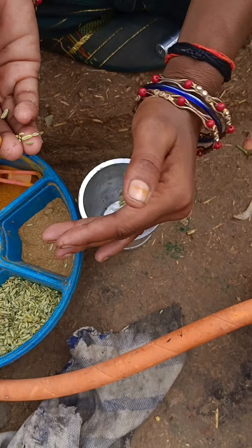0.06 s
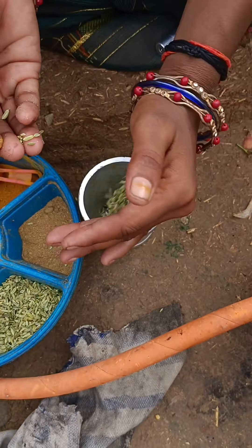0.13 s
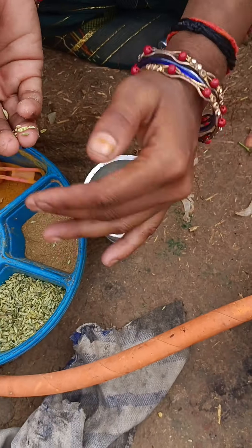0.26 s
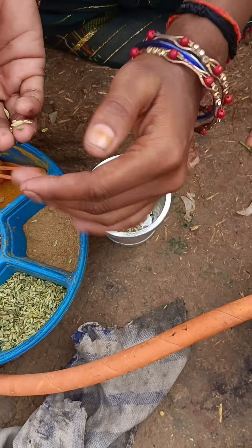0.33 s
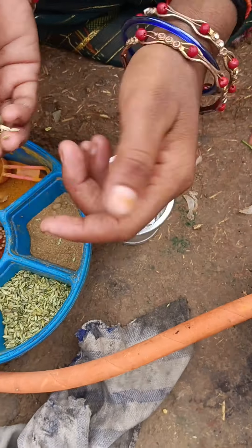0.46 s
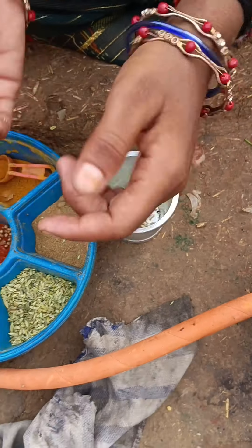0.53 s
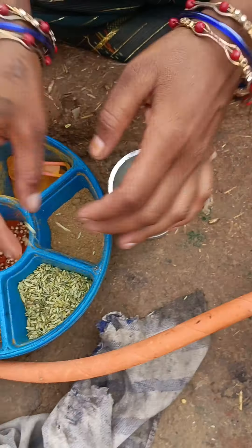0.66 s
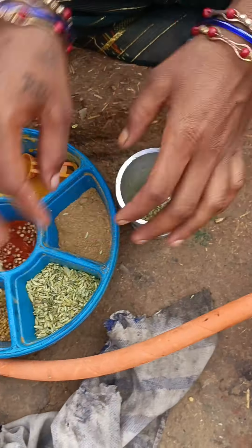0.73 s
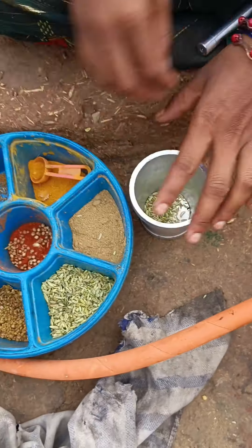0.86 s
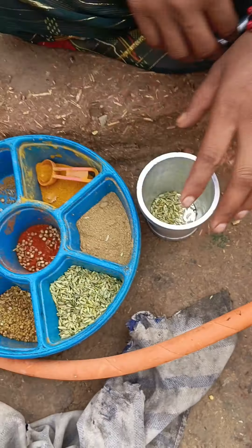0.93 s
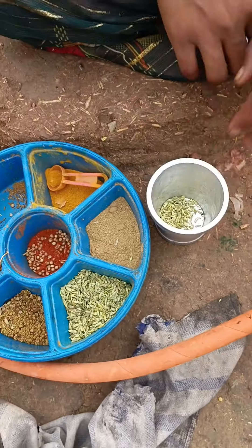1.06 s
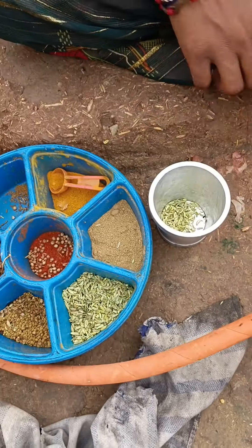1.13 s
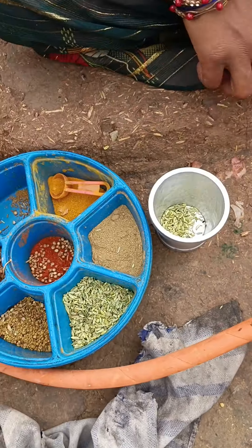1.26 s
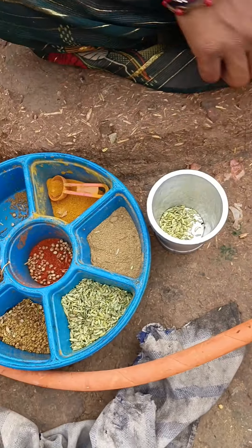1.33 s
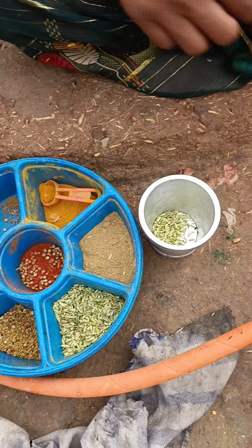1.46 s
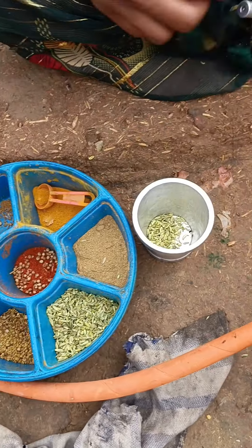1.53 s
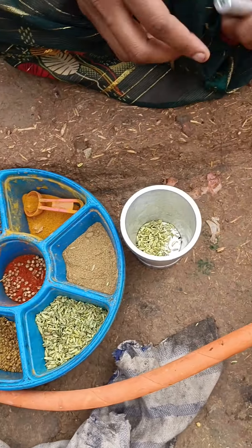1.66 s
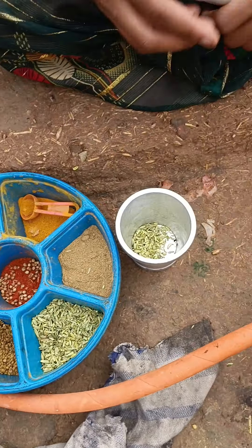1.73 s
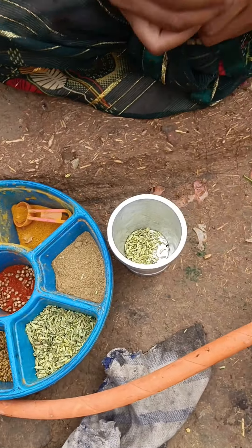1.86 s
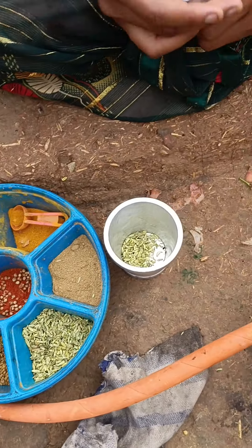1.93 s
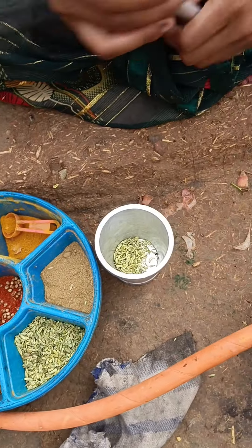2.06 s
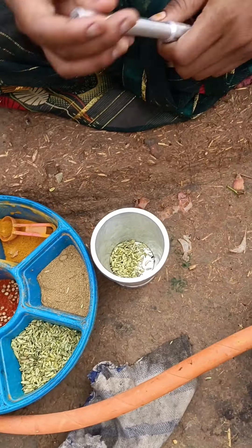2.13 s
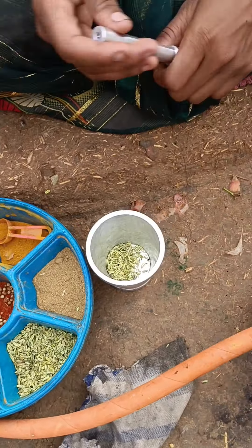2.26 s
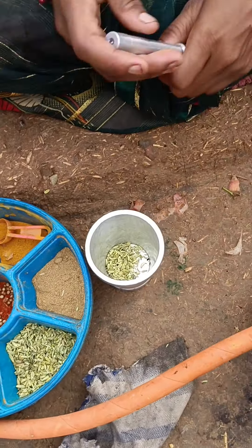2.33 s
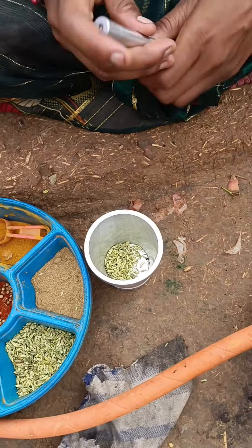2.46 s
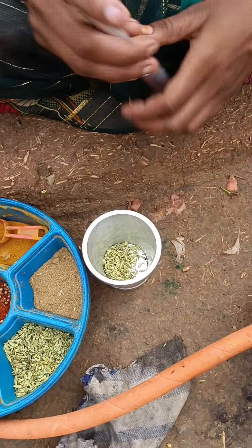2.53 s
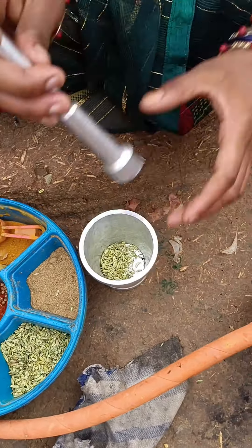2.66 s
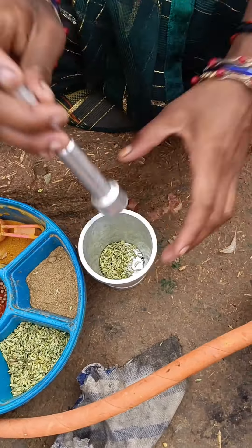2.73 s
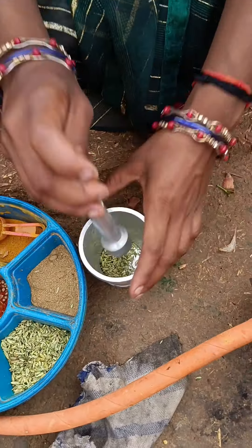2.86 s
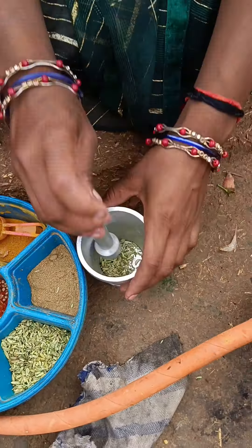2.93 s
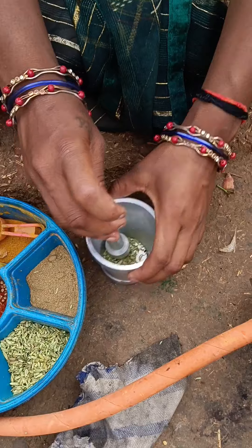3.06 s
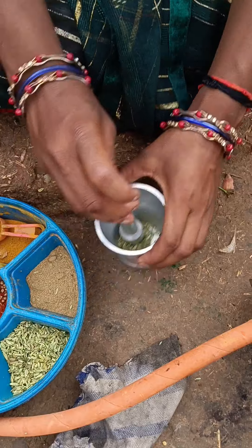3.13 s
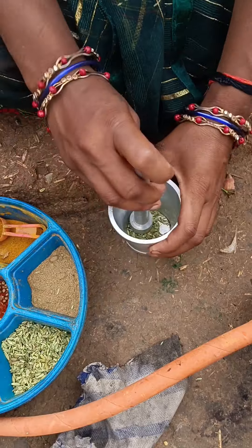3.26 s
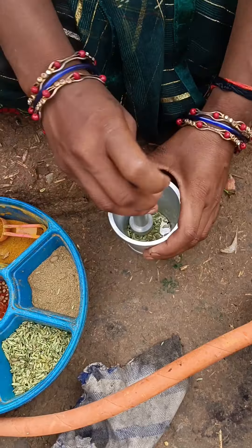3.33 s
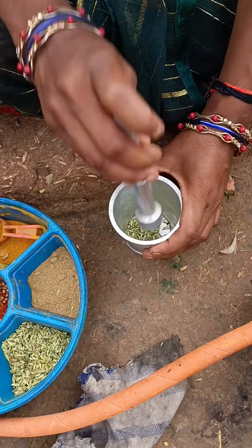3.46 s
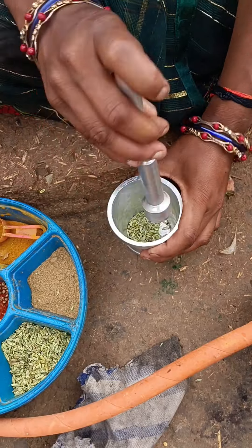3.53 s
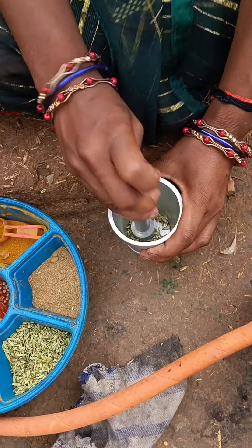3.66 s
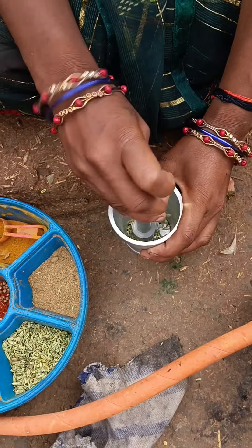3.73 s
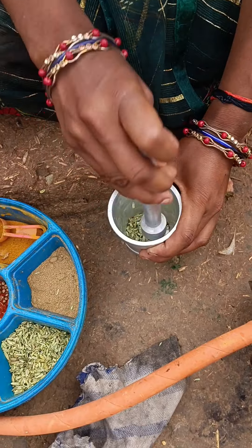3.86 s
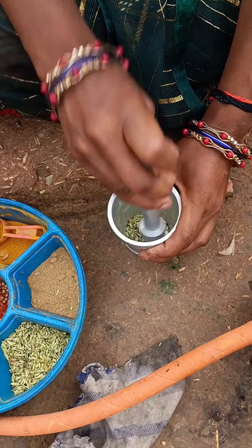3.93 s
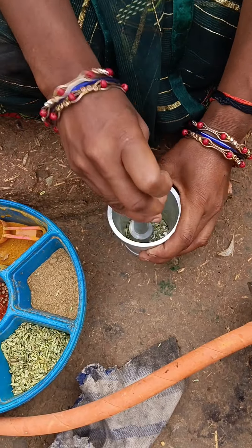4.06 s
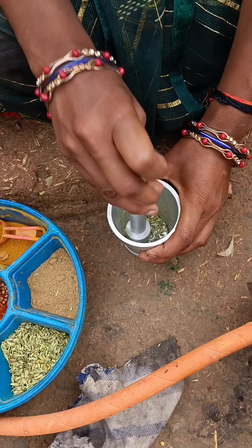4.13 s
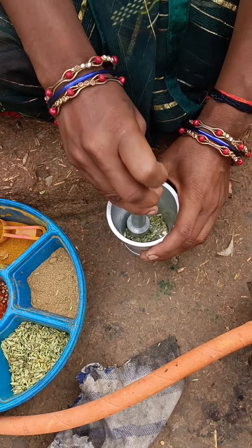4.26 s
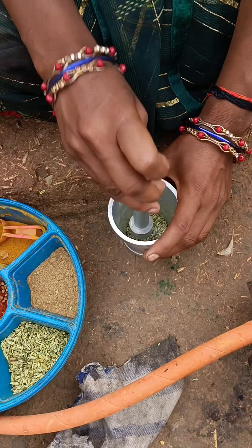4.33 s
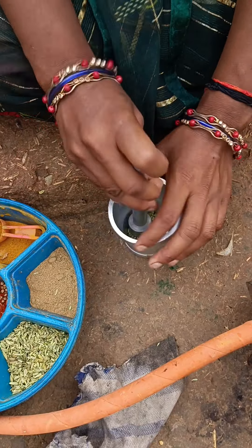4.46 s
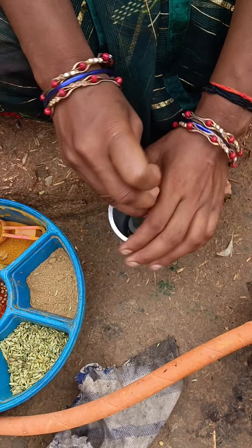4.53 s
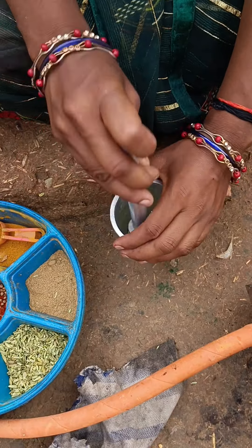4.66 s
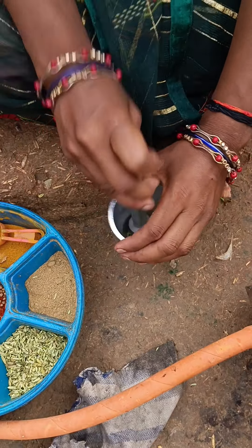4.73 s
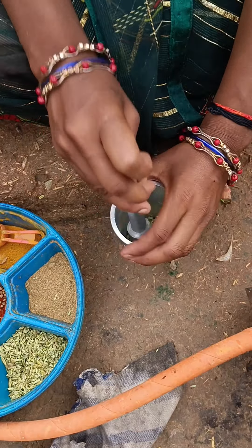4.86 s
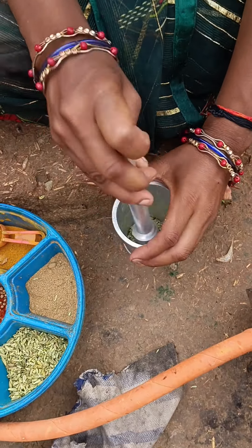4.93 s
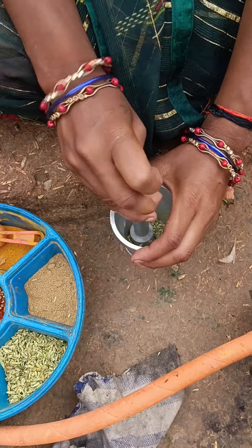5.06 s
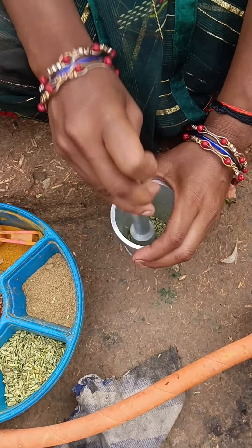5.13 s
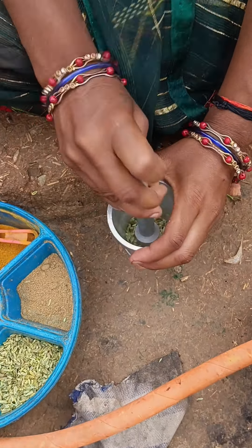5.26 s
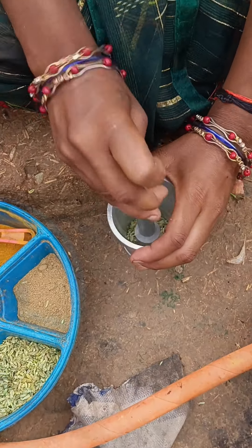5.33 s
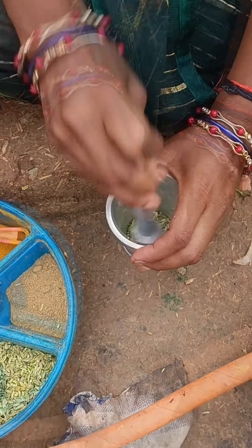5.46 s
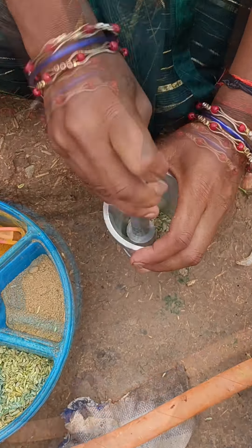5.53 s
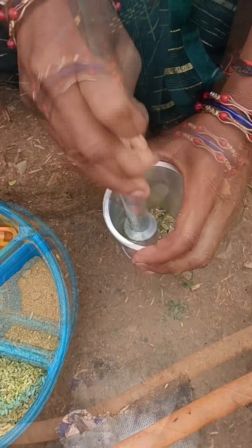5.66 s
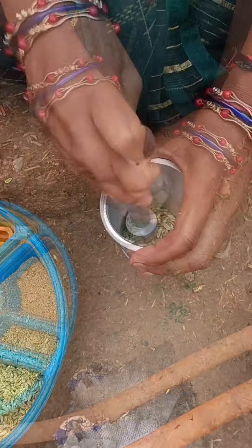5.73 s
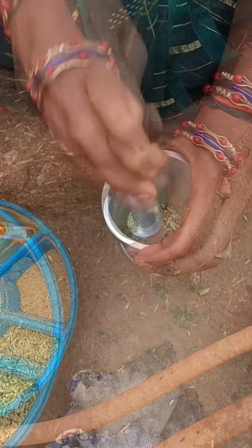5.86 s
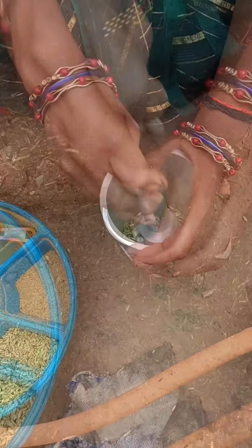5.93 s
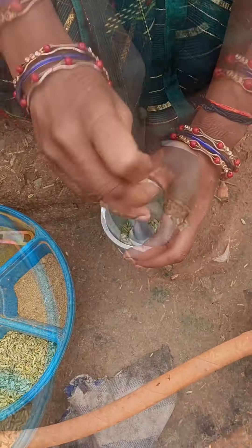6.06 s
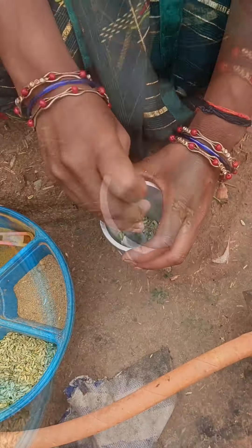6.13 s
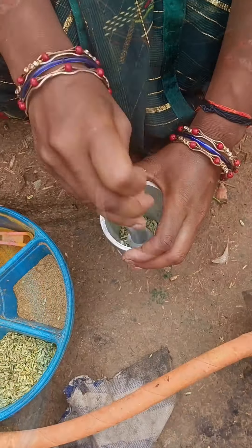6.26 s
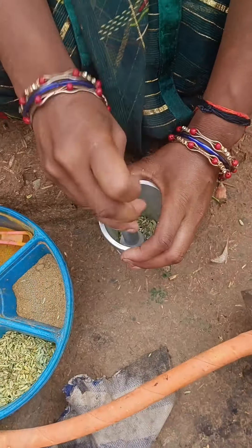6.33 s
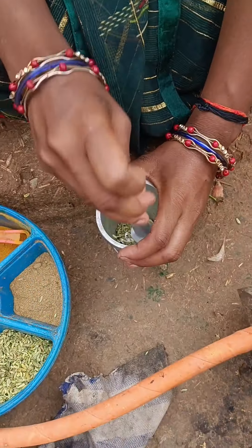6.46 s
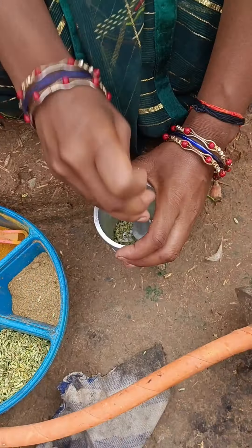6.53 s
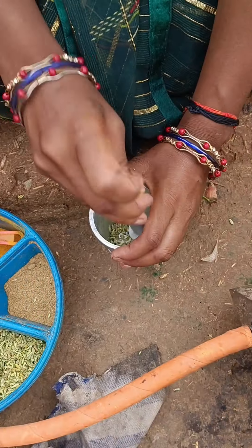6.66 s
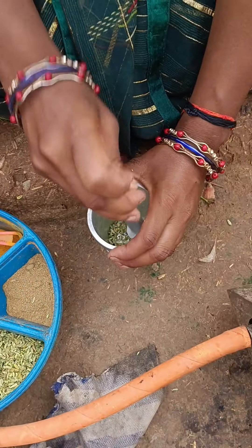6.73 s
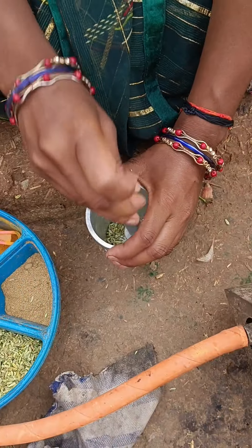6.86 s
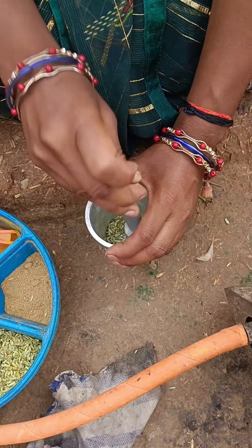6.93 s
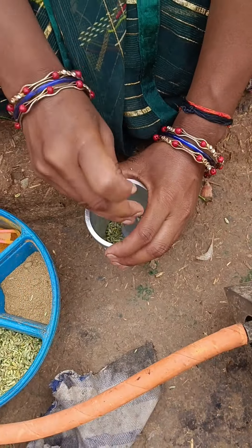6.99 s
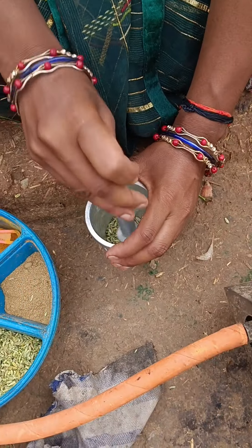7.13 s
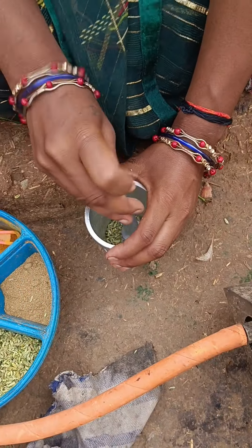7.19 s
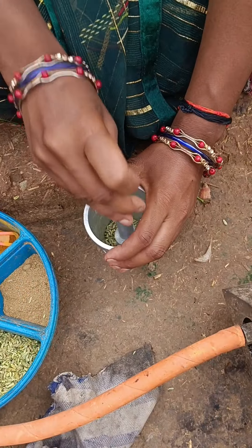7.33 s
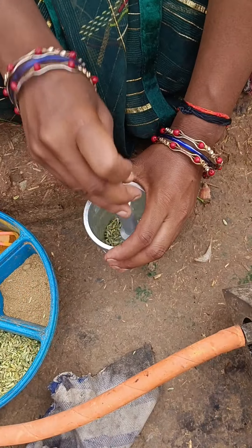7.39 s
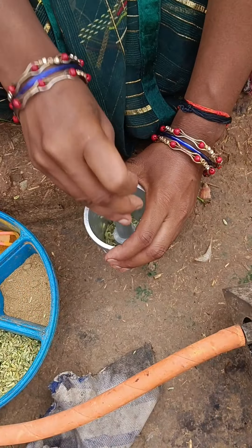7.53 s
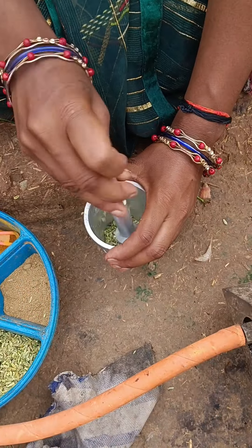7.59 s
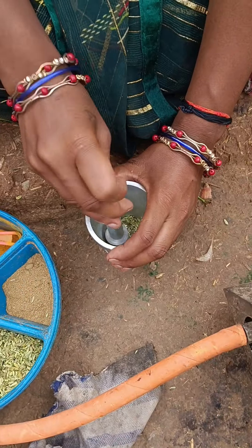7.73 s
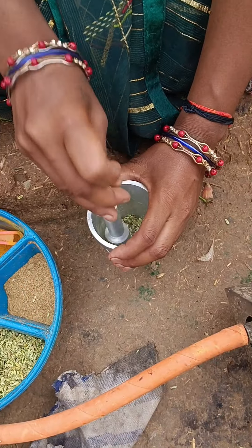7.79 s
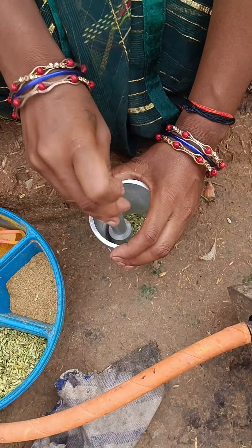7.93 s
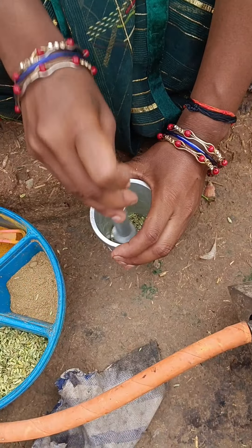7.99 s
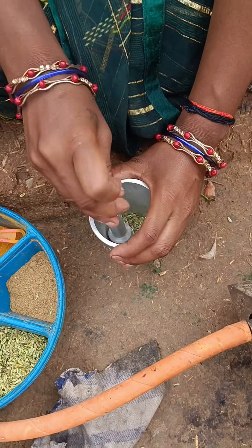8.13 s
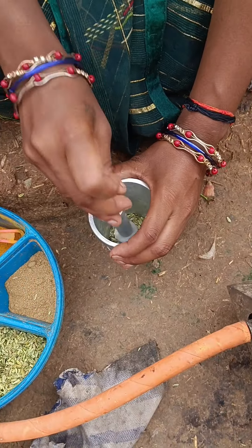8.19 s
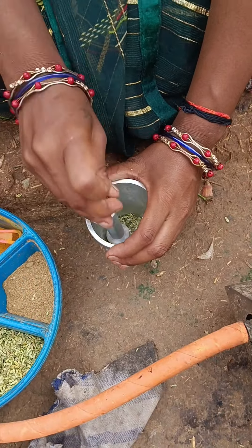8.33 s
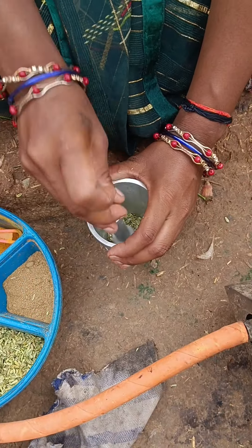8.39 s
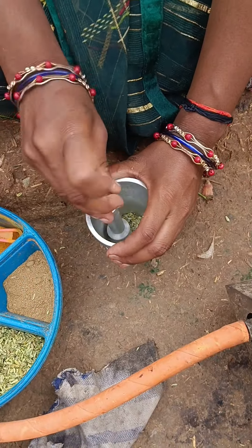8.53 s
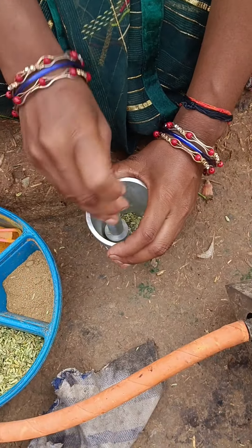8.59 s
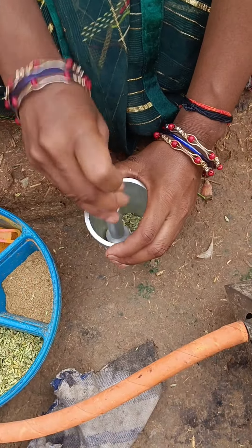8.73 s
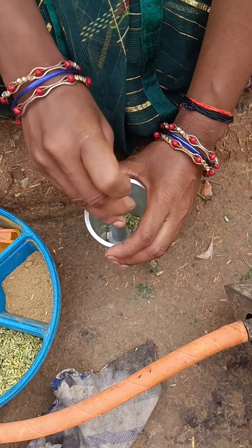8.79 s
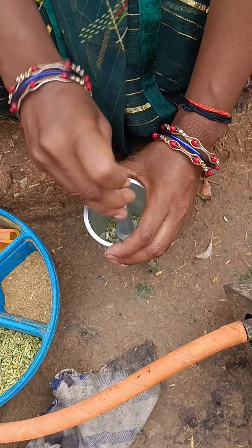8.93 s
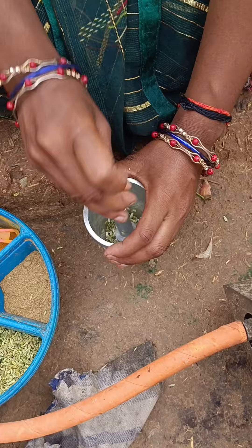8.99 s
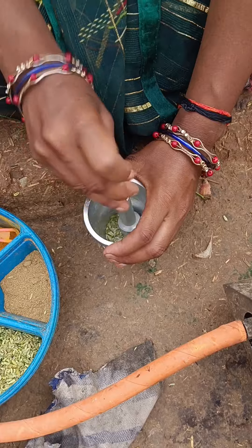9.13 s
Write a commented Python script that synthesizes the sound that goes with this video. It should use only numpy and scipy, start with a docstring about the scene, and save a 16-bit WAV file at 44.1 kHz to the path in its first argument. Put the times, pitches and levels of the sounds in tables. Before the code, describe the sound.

Outdoors, a few faint seed and bead ticks, then a metal pestle clinks and steadily pounds dry seeds in a small hand-held metal cup.

```python
"""Outdoor background hush, an even insect chirp and a slow far throb; ticks, seeds and beads, then metal
pounding in a cup. Shaped noise makes hush and wind, a phase-roughened sine the insect, beating low noise
the throb. Decaying wall modes ring; noise bursts through resonances make clack, thud and rattle; uneven
slips make scrapes, crunch and beads. The first blows break the seeds and bed the cup in; later ones crunch less.
"""
import sys
import numpy as np
from scipy import signal
from scipy.fft import rfft, irfft, next_fast_len
from scipy.io import wavfile
from scipy.ndimage import uniform_filter1d, minimum_filter1d

SR = 44100
rng = np.random.default_rng(int(sys.argv[2]) if len(sys.argv) > 2 else 0)


def put_to_file(sound):
    """Save the sound as 16-bit audio at rate SR, in the file named by the first command-line argument."""
    columns = np.atleast_2d(sound).T  # one column per channel
    safe = np.clip(columns, -1, 1)
    whole_steps = np.round(safe * 32767)
    wavfile.write(sys.argv[1], SR, whole_steps.astype(np.int16))


N = 404375
EVENT_T_S = np.arange(SR // 5) / SR  # time within one event
TOP_HZ = 15650  # band limit

# Background hush. Each row: frequency in Hz, level in dB per Hz.
HUSH_SPECTRUM = [(20, -51), (50, -13.5), (100, -0.5), (200, 0.5), (330, -9.5), (500, -7.5), (800, -12),
                 (1300, -7), (1950, -16), (3000, -10.5), (4300, -19), (5900, -15), (8000, -15.5),
                 (9500, -25), (11200, -20.5), (13000, -28.5), (16000, -34)]
# Level of the background hush, with faint cloth rustle and the lingering wash of the scrapes.
# Each row: time in seconds, level in dB.
HUSH_LEVEL = [(0, -48.5), (1.5, -49.5), (3.05, -46.5), (3.3, -49), (5.8, -48.5), (6.5, -45.5),
              (9.17, -47.5)]
# Left-right likeness of the hush. Each row: frequency in Hz, likeness from 0 to 1.
HUSH_LIKENESS = [(60, 0.99), (130, 1), (290, 0.82), (640, 0.19), (3000, 0), (15000, 0)]
# Wind on the microphones. Each row: frequency in Hz, level in dB per Hz.
WIND_SPECTRUM = [(20, -11), (45, -4), (70, -0.5), (130, -12), (400, -45)]
# Puffs of wind. Each row: start in seconds, level in dB.
PUFFS = [(.03, -52), (1.12, -44.5), (9.06, -43)]
PUFF_RISE_S, PUFF_FALL_S, BREEZE_DB = 0.016, 0.25, -64
# Distant throb. Each row: frequency in Hz, level in dB per Hz.
THROB_SPECTRUM = [(40, -15), (75, 10.5), (110, -10.5), (220, 2.5), (320, -12), (700, -44)]
THROB_PERIOD_S, FIRST_THROB_S = .2565, .205
CHIRP_PERIOD_S, FIRST_CHIRP_S, CHIRP_HALF_S, CHIRP_DB = .1076, .098, .008, -54

# Small dry ticks of handling. Each row: start in seconds, level in dB.
TICKS = [(0.162, -48), (.968, -42.5), (1.148, -44), (1.548, -47), (2.37, -42.5), (2.447, -40.5)]
# Colour of those ticks. Each row: frequency in Hz, level in dB per Hz.
TICK_SPECTRUM = [(200, -10), (1300, 0), (5000, -2), (15000, -13.5)]
TICK_T60_S = .014

# Seeds poured, sprinkled and shifted. Each row: start in seconds, length in seconds, level in dB.
SEEDS = [(.28, 0.15, -53.5), (1.045, 0.054, -41.5), (3.888, 0.024, -36.5), (3.946, 0.045, -34),
         (4.273, 0.015, -41.5), (4.555, 0.013, -44)]
# Cracking seeds. Each row: frequency in Hz, level in dB per Hz.
CRUNCH_SPECTRUM = [(1000, -1.5), (3000, -0.5), (5500, 1), (8000, 8), (10000, 3), (14000, 6), (16000, 7)]
CRUNCH_DB, WHOLE_CRUNCH_DB = -41.5, -32.5  # on broken seeds, on whole seeds
CRUNCH_S, WHOLE_CRUNCH_S = 0.02, 0.032

# Bracelet beads running together. Each row: start in seconds, length in seconds, level in dB.
BEADS = [(.712, 0.042, -43), (.815, .03, -38.5), (1.528, 0.053, -48.5), (1.652, 0.032, -45.5),
         (3.02, 0.025, -49), (4.808, 0.014, -43.5), (6.665, .012, -37.5), (7.508, 0.016, -40),
         (8.176, 0.033, -44.5)]
# Resonances of beads and ornaments. Each row: frequency in Hz, width in Hz, level in dB.
BEAD_MODES = [(3240, 1500, -4.5), (6040, 560, -1.5), (8590, 83, 8.5), (11030, 84, 6), (12700, 400, -12),
              (14430, 105, 6.5)]

# Pestle on the wall. Each row: start in seconds, ring level in dB, ring t60 in seconds,
# upper modes level in dB, clack level in dB.
CLINKS = [(3.131, -11, .17, -15, -22.5), (4.108, -20.5, 0.032, -36.5, -46), (4.3419, -19, 0.12, -29, -21),
          (4.4066, -8.5, 0.099, -20, -20.5), (4.6541, -12, 0.57, -34.5, -15.5),
          (4.9316, -28.5, 0.18, -26.5, -20), (5.117, -30.5, 0.045, -32.5, -25.5),
          (5.3243, -32.5, 0.045, -41, -43), (5.3758, -18, 0.026, -26.5, -25.5),
          (5.5432, -31.5, 0.084, -43, -35.5), (5.6305, -25.5, 0.031, -28, -26.5),
          (5.9169, -26.5, 0.052, -42, -31), (6.197, -20.5, 0.034, -57, -32), (6.5069, -43, 0.043, -53, -29),
          (6.691, -14.5, 0.044, -42, -31), (6.94, -46, 0.033, -51, -26.5), (7.044, -20.5, 0.067, -51, -22),
          (7.3333, -13, 0.043, -55, -25.5), (7.7858, -15, 0.053, -33.5, -26),
          (7.8241, -16, 0.011, -39, -19.5), (7.9988, -21.5, .048, -55, -30),
          (8.0505, -20, 0.032, -38, -21.5), (8.2271, -14.5, 0.015, -25, -25.5),
          (8.2723, -30, 0.083, -32, -20), (8.4324, -12, 0.02, -31.5, -21), (8.6012, -15, 0.021, -41, -21),
          (8.9133, -35, 0.039, -53, -19.5)]
RING_HZ = 3122  # lowest wall mode
# Upper wall modes: frequencies in Hz.
UPPER_HZ = [6440, 8305, 10812, 12885]
# The same upper modes. Each row: level in dB, t60 as a share of the lowest mode's.
UPPER_MODES = [(-3, 0.2), (4.5, 0.58), (-11, 0.84), (-11.5, 0.58)]
LONGEST_RING_S = 0.11  # until the pestle or a finger stops the wall
# Cup held in the hand. Each row: frequency in Hz, width in Hz, level in dB.
CUP_MODES = [(1115, 610, -20.5), (1560, 620, -18.5), (2182, 113, -10.5), (3051, 71.5, 1), (4010, 310, -9.5),
             (4710, 560, -18.5), (6307, 137, -12), (8086, 240, -16.5), (11220, 96, -24), (13100, 850, -32),
             (13130, 180, -23.5), (14200, 600, -41)]
# Cup drawn from the left towards the middle. Each row: time in seconds, left over right in dB.
CUP_PAN = [(3.2, 9), (4.1, 1), (9.17, 2)]
# Phase between the microphones for the metal. Each row: frequency in Hz, lead of the left in radians.
WALL_LEAD = [(1000, 0.28), (2200, -1.2), (3100, -1.38), (4400, -1.45), (6400, -1.37), (8300, -1.55),
             (12000, -1.7)]

# Loose cup chattering after the first touch. Each row: start in seconds, level in dB.
RATTLE = [(3.132, -21), (3.1426, -31), (3.151, -22), (3.159, -25.5), (3.167, -27.5), (3.1725, -30)]
# Rocking cup. Each row: frequency in Hz, width in Hz, level in dB.
ROCKING_MODES = [(945, 74, -7.5), (1142, 25, 0.5), (1380, 160, -6.5), (1780, 230, -12), (2184, 45, 8.5),
                 (3130, 65, -13), (4170, 67, 4.5), (4320, 280, -6), (6300, 260, -4)]

# Pestle on the seeds at the bottom. Each row: start in seconds, thud level in dB, hollow note level in dB.
BLOWS = [(3.8337, -28.5, -24.5), (4.1543, -29, -35), (4.4091, -37.5, -37), (4.653, -30, -48),
         (4.932, -36, -29), (5.1856, -32.5, -30), (5.4352, -33, -48), (5.6737, -36.5, -40),
         (5.8462, -38.5, -50), (6.067, -30, -26), (6.2929, -35.5, -40.5), (6.5106, -32, -44),
         (6.723, -37.5, -46), (6.9438, -26, -23), (7.147, -25, -24), (7.3729, -26, -23),
         (7.6043, -28, -22.5), (7.8236, -33.5, -31), (8.0528, -44.5, -31), (8.273, -33, -34),
         (8.4949, -30.5, -34), (8.709, -26.5, -14.5), (8.9185, -30, -25), (9.1129, -32, -32.5)]
# Cup's base on the earth. Each row: frequency in Hz, width in Hz, level in dB.
BASE_MODES = [(85, 5.4, 1), (212, 63, 2.5), (415, 79, -2.5), (555, 125, 0), (763, 84, 2), (890, 175, -4.5),
              (1586, 250, -16.5)]
WHOLE_S = 0.57  # pounding time by which the unbroken share has fallen to 1/e
NOTE_HZ, WHOLE_NOTE_HZ, CORNER_NOTE_HZ = 1091, 1185, 1001  # hollow note: broken seeds, whole seeds, corner
PUSH_DB, BEDDING_PUSH_DB = -41.5, -28.5  # low push of the earth: once bedded, at first
PUSH_HZ, BEDDING_PUSH_HZ = 103.7, 130
SETTLE_DB, BEDDING_SETTLE_DB = -9, -1  # shaking after a thud, relative to it: once bedded, at first
# Thud phase from the rocking base. Each row: frequency in Hz, lead of the left in radians.
THUD_LEAD = [(200, 0), (350, 0), (560, 1.7), (850, 2.3), (1120, .9), (2000, 0)]
# Thud at the two microphones. Each row: frequency in Hz, left over right in dB.
THUD_PAN = [(60, 3), (120, -0.5), (240, -2), (480, 4), (950, 1), (1890, -5), (3770, 11), (7520, 1),
            (15000, -2.0)]

# Pestle drawn up the wall. Each row: start in seconds, length in seconds, level in dB.
LIFTS = [(4.083, 0.035, -36), (5.345, 0.043, -37), (5.58, 0.019, -28.5), (5.751, 0.035, -38),
         (5.923, 0.072, -39.5), (5.997, 0.014, -26.5), (6.213, 0.017, -28), (6.368, 0.078, -31.5),
         (6.579, 0.035, -22), (6.793, 0.1, -26.5), (7.047, 0.0365, -30), (8.238, 0.015, -30.5),
         (8.441, .01, -30.5), (8.608, 0.041, -23), (8.837, 0.017, -27), (8.995, 0.055, -21.5)]
FALL_LEAD_S, FALL_S, FALL_DB = .043, 0.017, -30.5  # scrape down: start before the blow, length, level
SKID_S, SKID_DB = 0.037, -37  # a blow in the corner skids on towards the middle
# Rasp of seed dust on the wall. Each row: time in seconds, level in dB.
DUST = [(5.6, -39), (6.4, -12.5), (8.2, -19.5)]

# Answer of the surroundings. Each row: frequency in Hz, t60 in seconds.
YARD_T60 = [(100, .4), (300, .28), (1000, .14), (3000, .1), (12000, .1)]


def amp(db):
    """Decibels to gain."""
    return 10 ** (np.asarray(db) / 20)


def unit(x):
    """x at rms 1."""
    return x / np.sqrt(np.mean(x ** 2) + 1e-20)


def onset_unit(x, length_s):
    """x scaled to rms 1 over its first length_s."""
    onset = x[..., :max(int(length_s * SR), 8)]
    return x / np.sqrt(np.mean(onset ** 2) + 1e-20)


def fade(t60_s):
    """Exponential decay by 60 dB in t60_s."""
    return amp(-60 * EVENT_T_S / max(t60_s, 1e-4))


def along(points, hz):
    """(Hz, value) points interpolated on a log axis."""
    f, v = np.transpose(points)
    return np.interp(np.log(hz + 1), np.log(f + 1), v)


def at_time(rows, s):
    """(s, value) rows interpolated at s."""
    return np.interp(s, *np.transpose(rows))


def curve(rows):
    """(s, value) rows at every sample."""
    return at_time(rows, np.arange(N) / SR)


def filtered(x, response):
    """x times a complex response of frequency."""
    n = x.shape[-1]
    m = next_fast_len(n + SR // 25)
    return irfft(rfft(x, m) * response(np.fft.rfftfreq(m, 1 / SR)), m)[..., :n]


def coloured(x, spectrum):
    """x filtered by (Hz, dB) points."""
    return filtered(x, lambda hz: amp(along(spectrum, hz)))


def resonate(x, modes):
    """x through parallel body resonances of alternating sign."""
    def response(f):
        total = 0
        for k, (centre, width, db) in enumerate(modes):
            damping = 1j * f * width
            total = total + (-1) ** k * amp(db) * damping / (centre * centre - f * f + damping)
        return total
    return filtered(x, response)


def varied(modes, spread_db, detune):
    """The same resonances, touched at another spot under another grip."""
    return [(hz * (1 + detune * rng.normal()), width, db + spread_db * rng.normal()) for hz, width, db in modes]


def lowpass(x, hz):
    """A soft contact passes little above hz."""
    return filtered(x, lambda f: 1 / (1 + 1j * f / hz - (f / hz) ** 2))


def add(track, s, sound):
    """Mix a sound into the track at time s."""
    start = max(round(s * SR), 0)
    track[:, start:start + len(EVENT_T_S)] += sound[..., :N - start]


def panned(x, db):
    """x with the left side db louder than the right."""
    return x * amp(np.array([[db], [-db]]) / 2)


def left_leads(x, rows):
    """x with the left ahead by a phase given in (Hz, radians) rows."""
    return filtered(x, lambda hz: np.exp(.5j * along(rows, hz) * np.array([[1], [-1]])))


def pair(apart):
    """Noise for both microphones, partly each one's own."""
    n = len(EVENT_T_S)
    return rng.standard_normal(n) + apart * rng.standard_normal((2, n))


def slips(length_s, rate_hz, grit, release_s, uneven_db=2.5):
    """Force of one stroke: uneven slips, each a tiny burst of grit, over steady friction."""
    n = len(EVENT_T_S)
    times_s = np.cumsum(rng.gamma(2, .5 / rate_hz, size=200))
    sizes = amp(uneven_db * rng.standard_normal(len(times_s)).clip(-2, 2))
    hits = np.bincount((times_s * SR).astype(int), sizes, n)[:n]
    bursts = unit(signal.fftconvolve(hits, fade(.007))[:n])
    rise = np.minimum(EVENT_T_S / (.3 * length_s), 1)
    stroke = rise * np.exp(-np.maximum(EVENT_T_S - length_s, 0) / release_s)
    return (bursts + grit) * pair(apart=1.0) * stroke


def whole(s):
    """Share of the seeds still unbroken at time s."""
    return np.exp(-((s - BLOWS[0][0]) / WHOLE_S) ** 4)


def between(broken, unbroken, s):
    """A value passing from that of whole seeds to that of broken ones."""
    return broken + (unbroken - broken) * whole(s)


def cornered(s):
    """Whether the blow at s lands in the corner, so that the wall rings with it."""
    return any(abs(at - s) < .012 and ring_db > -35 for at, ring_db, *_ in CLINKS)


def scrapes_down(s):
    """Whether the pestle, just lifted, stays on the wall down to the blow at s without knocking."""
    lifted = any(0 < s - (at + length_s) < .1 for at, length_s, _ in LIFTS)
    knocked = any(.02 < s - at < .056 for at, *_ in CLINKS)
    return lifted and not knocked


def rush(spectrum, patchy_db):
    """Steady stereo noise of rms 1 with patches of random gain."""
    z = signal.stft(rng.standard_normal((2, N)), nperseg=512)[2]
    field = uniform_filter1d(rng.standard_normal(z.shape[1:]), size=6, axis=0)
    field = uniform_filter1d(field, size=14, axis=1)
    noises = signal.istft(z * amp(patchy_db * unit(field)), nperseg=512)[1][:, :N]

    def mid_side(hz):
        # the likeness sets the share of sound common to both sides
        turn = np.arccos(np.clip(along(HUSH_LIKENESS, hz), -1, 1)) / 2
        return amp(along(spectrum, hz)) * np.array([np.cos(turn), np.sin(turn)])

    mid, side = filtered(noises, mid_side)
    return unit(np.array([mid + side, mid - side]))


def rumble(spectrum, apart):
    """Low stereo noise of rms 1."""
    noises = rng.standard_normal(N) + apart * rng.standard_normal((2, N))
    return unit(coloured(noises, spectrum))


def wind():
    """A faint breeze with puffs that rise quickly and die away."""
    strength = amp(BREEZE_DB)
    for s, db in PUFFS:
        since_s = np.maximum(np.arange(N) / SR - s, 0)
        puff = np.minimum(since_s / PUFF_RISE_S, 1) * np.exp(-since_s / PUFF_FALL_S)
        strength = strength + amp(db) * puff
    return strength * rumble(WIND_SPECTRUM, apart=0.74)


def throb(level_db=-55):
    """Distant low noise in slow, even beats whose strength drifts."""
    since_s = (np.arange(N) / SR - FIRST_THROB_S) % THROB_PERIOD_S
    drift_rows = np.transpose([np.linspace(0, N / SR, 30), rng.normal(0, 3, 30)])
    drift = amp(curve(drift_rows))
    beat = unit((1 - np.exp(-since_s / .015)) * np.exp(-since_s / .06) * drift)
    return amp(level_db) * beat * rumble(THROB_SPECTRUM, apart=0.11)


def background():
    """Hush with faint cloth rustle and the wash of the scrapes, the distant throb and puffs of wind."""
    hush = amp(curve(HUSH_LEVEL)) * rush(HUSH_SPECTRUM, patchy_db=1)
    return panned(hush, -0.92) + throb() + panned(wind(), 5.2)


def insect(chirp_hz=6430, fall_hz=110):
    """A far insect: short raspy chirps at an even pace, each sagging in pitch."""
    from_first_s = np.arange(N) / SR - FIRST_CHIRP_S
    half_s = CHIRP_PERIOD_S / 2
    since = ((from_first_s + half_s) % CHIRP_PERIOD_S - half_s) / CHIRP_HALF_S  # in half-lengths
    phase = 2 * np.pi * np.cumsum(chirp_hz - fall_hz * since) / SR
    rasp = unit(filtered(rng.standard_normal((2, N)), lambda f: np.exp(-(f / 200) ** 2)))
    return amp(CHIRP_DB) * unit(np.sin(phase + rasp)) * np.exp(-.5 * since ** 2)


def loose_seeds(rate_hz=70, still_db=-64, stirred_db=-57):
    """Stray ticks of husks, stronger once the pounding stirs them."""
    ticks = (rng.random(N) < rate_hz / SR) * amp(5 * rng.standard_normal(N).clip(-2, 2))
    ticks = signal.fftconvolve(ticks, fade(0.057))[:N] * rng.standard_normal((2, N))
    level_db = np.where(np.arange(N) / SR < BLOWS[0][0], still_db, stirred_db)
    return unit(coloured(ticks, CRUNCH_SPECTRUM)) * amp(level_db)


def handling():
    """Fingers and ornaments tick against things, too lightly to ring."""
    out = np.zeros((2, N))
    for s, db in TICKS:
        tick = coloured(pair(apart=1.0) * fade(TICK_T60_S), TICK_SPECTRUM)
        add(out, s, amp(db) * onset_unit(tick, 0.0049))
    return out


def crunch():
    """Dry seeds crack in clusters, each cluster with its own colour."""
    out = np.zeros((2, N))
    crushed = [(s, between(CRUNCH_S, WHOLE_CRUNCH_S, s), between(CRUNCH_DB, WHOLE_CRUNCH_DB, s))
               for s, *_ in BLOWS]
    for s, length_s, db in list(SEEDS) + crushed:
        colour = [(hz, level_db + rng.normal(0, 2)) for hz, level_db in CRUNCH_SPECTRUM]
        force = slips(length_s, rate_hz=300, grit=0.14, release_s=0.0032)
        add(out, s, amp(db) * onset_unit(coloured(force, colour), length_s))
    return out


def bracelets(shaken_db=-49, corner_db=-42, delay_s=.014, click_db=-3):
    """Beads tinkle as the hands move, and again just after every blow jolts the wrist."""
    out = np.zeros((2, N))
    jolts = [(s + delay_s, .035, (corner_db if cornered(s) else shaken_db) + rng.normal(0, 0.95))
             for s, *_ in BLOWS]
    for s, length_s, db in list(BEADS) + jolts:
        force = slips(length_s, rate_hz=280, grit=.2, release_s=.004)
        modes = varied(BEAD_MODES, spread_db=6.5, detune=0.012)
        tinkle = onset_unit(resonate(force, modes), length_s)
        # each contact also gives a dry click
        clicks = onset_unit(resonate(force, [(11900, 8000, 0)]), length_s)
        add(out, s, amp(db) * onset_unit(tinkle + amp(click_db) * clicks, length_s))
    return out


def clinks(chatter=1.0, attack_s=0.00023, upper_pan_db=-3, edge_db=-9):
    """Metal on metal: a chattering contact, then the wall rings for as long as the grip allows."""
    out = np.zeros((2, N))
    rise = 1 - np.exp(-EVENT_T_S / attack_s)
    stop = amp(-1200 * np.maximum(EVENT_T_S - LONGEST_RING_S, 0))
    for s, ring_db, t60_s, upper_db, clack_db in CLINKS:
        # a tighter grip shortens the ring and pulls its pitch
        ring_hz = RING_HZ * (1 + rng.normal(0, .00008) / t60_s)
        ring = np.sin(2 * np.pi * ring_hz * EVENT_T_S) * fade(t60_s)
        # short waves reach each microphone with their own strength and phase
        modes = []
        for hz, (db, share) in zip(UPPER_HZ, UPPER_MODES):
            wave = np.sin(2 * np.pi * hz * EVENT_T_S + rng.normal(0, .5, (2, 1)))
            wave = wave * amp(rng.normal(0, 1, (2, 1)))
            modes.append(amp(db) * wave * fade(t60_s * share))
        upper = sum(modes)
        # a loose cup buzzes against the pestle for longer
        buzz = 0.32 * fade(min(t60_s * chatter + 0.029, .075))
        force = pair(apart=0.91) * rise * (fade(0.011) + buzz)
        clack = resonate(force, varied(CUP_MODES, spread_db=4, detune=0.002))
        sound = amp(ring_db) * onset_unit(ring * rise * stop, 0.0094)
        sound = sound + amp(clack_db) * onset_unit(clack, 0.023)
        # a hard edge contact brings out the second mode
        sound += amp(clack_db + edge_db) * onset_unit(modes[0] * rise * stop, 0.0032)
        shimmer = amp(upper_db) * onset_unit(upper * rise * stop, 0.02)
        add(out, s, panned(sound, at_time(CUP_PAN, s)) + panned(shimmer, upper_pan_db))
    return out


def rattle(pan_db=5):
    """Quick bounces of the cup before the hand closes on it."""
    out = np.zeros((2, N))
    for s, db in RATTLE:
        bounce = resonate(pair(apart=0.8) * fade(0.009), ROCKING_MODES)
        add(out, s, amp(db) * onset_unit(bounce, .006))
    return panned(out, pan_db)


def blows(hollow_t60_s=0.044, swell_s=0.00089, crush_t60_s=0.05, soft_hz=1600, settle_t60_s=0.16,
          settle_hz=330, push_t60_s=0.081, puff_db=-7, puff_t60_s=0.07):
    """Seeds cushion the blow: the base thuds on the earth and the air in the cup sounds its note."""
    out = np.zeros((2, N))
    for s, thud_db, hollow_db in BLOWS:
        note_hz = CORNER_NOTE_HZ if cornered(s) else between(NOTE_HZ, WHOLE_NOTE_HZ, s)
        note_hz = note_hz * (1 + rng.normal(0, 0.0031))
        force = pair(apart=0.13) * fade(crush_t60_s)
        force[:, 0] += 8  # the impact itself
        thud = lowpass(resonate(force, varied(BASE_MODES, spread_db=-0.5, detune=0.024)), soft_hz)
        # the cushion of seeds gives a dull puff between the base's resonances
        puff = lowpass(resonate(pair(apart=0.36) * fade(puff_t60_s), [(520, 620, 0)]), soft_hz)
        # cup, hand and ground shake on in the bass
        settle = lowpass(resonate(pair(apart=0.059) * fade(settle_t60_s), BASE_MODES), settle_hz)
        settle_db = between(SETTLE_DB, BEDDING_SETTLE_DB, s)
        thud = onset_unit(thud, 0.028) + amp(puff_db) * onset_unit(puff, 0.011)
        thud = thud + amp(settle_db) * onset_unit(settle, 0.0143)
        # the earth gives way under the cup in one low push
        push_hz = between(PUSH_HZ, BEDDING_PUSH_HZ, s)
        push = np.sin(2 * np.pi * push_hz * EVENT_T_S)
        push = push * np.minimum(EVENT_T_S * push_hz, 1) * fade(push_t60_s)
        add(out, s, amp(between(PUSH_DB, BEDDING_PUSH_DB, s)) * onset_unit(push, 0.0087))
        swell = (1 - np.exp(-EVENT_T_S / swell_s)) ** 2
        note = np.sin(2 * np.pi * note_hz * EVENT_T_S) * swell * fade(hollow_t60_s)
        # crushing seeds roughen the note
        rough = lowpass(resonate(force, [(note_hz, 160, 0), (1500, 300, -12)]), soft_hz)
        note = onset_unit(note, 0.018) + 0.5 * onset_unit(rough, 0.025)
        add(out, s, amp(thud_db) * thud + amp(hollow_db) * onset_unit(note, 0.014))
    return out


def rubs(pan_db=2, sing_db=-2, slip_rate_hz=380, friction=0.53, stop_db=-5, stop_s=0.00868):
    """The pestle sticks and slips along the damped wall, whose lowest mode sings a little."""
    out = np.zeros((2, N))
    falls = [(s - FALL_LEAD_S, FALL_S, FALL_DB) for s, *_ in BLOWS if scrapes_down(s)]
    skids = [(s, SKID_S, SKID_DB) for s, *_ in BLOWS if cornered(s)]
    # a wall that still rings buzzes briefly against the pestle that stops it
    stops = [(s + LONGEST_RING_S, stop_s, db - 60 * LONGEST_RING_S / t60_s + stop_db)
             for s, db, t60_s, *_ in CLINKS if t60_s > LONGEST_RING_S]
    for s, length_s, db in list(LIFTS) + falls + skids + stops:
        force = slips(length_s, rate_hz=slip_rate_hz, grit=friction, release_s=0.0082, uneven_db=5)
        grind = resonate(force, varied(CUP_MODES, spread_db=1.5, detune=0.015))
        sing = resonate(force, [(RING_HZ, 80, sing_db)])
        # seed dust between the metals adds a broad rasp
        dust_db = at_time(DUST, s)
        dust_force = slips(length_s, rate_hz=630, grit=0.13, release_s=0.0052)
        rasp = resonate(dust_force, [(1890, 860, dust_db), (4240, 920, dust_db + 4.0)])
        add(out, s, amp(db) * onset_unit(grind - sing + rasp, length_s))
    return panned(out, pan_db)


def yard(x):
    """A faint answer from the surroundings, longest in the bass."""
    hz, t_s, z = signal.stft(rng.standard_normal((2, SR // 2)), SR, nperseg=256)
    decay = amp(-60 * t_s / along(YARD_T60, hz)[:, None])
    tail = signal.istft(z * decay, SR, nperseg=256)[1]
    return signal.fftconvolve(x, tail / np.linalg.norm(tail[0]), axes=1)[:, :N]


def scene(metal_wet_db=-23, thud_wet_db=-16):
    """The cup and hands near the microphones, the yard around them."""
    metal = left_leads(clinks() + rattle() + rubs(), WALL_LEAD)
    thuds = left_leads(blows(), THUD_LEAD)
    thuds = filtered(thuds, lambda hz: amp(along(THUD_PAN, hz) * np.array([[.5], [-.5]])))
    small = crunch() + handling() + bracelets() + loose_seeds()
    echo = yard(amp(metal_wet_db) * (metal + small) + amp(thud_wet_db) * thuds)
    return metal + thuds + small + echo + insect() + background()


def record(dry):
    """A limiter holds the loudest peaks under full scale; a steep filter sets the band limit."""
    needed = np.minimum(1, .95 / (np.abs(dry).max(axis=0) + 1e-9))
    gain = uniform_filter1d(minimum_filter1d(needed, size=129), size=129)
    return filtered(dry * gain, lambda hz: 1 / (1 + (hz / TOP_HZ) ** 80))


dry = scene()
out = record(dry)
put_to_file(out)
```